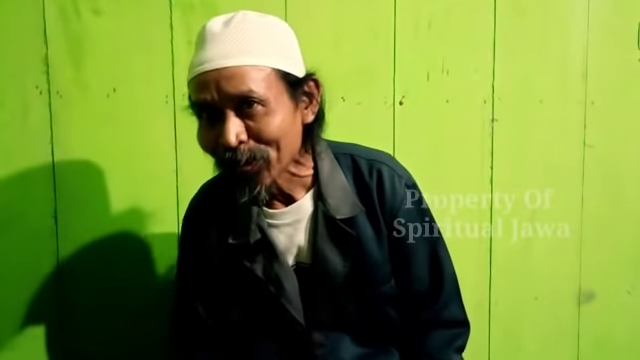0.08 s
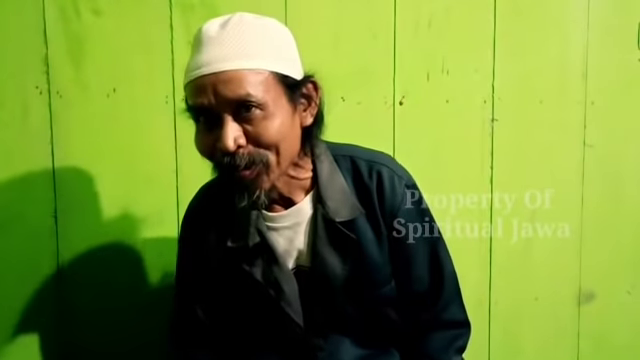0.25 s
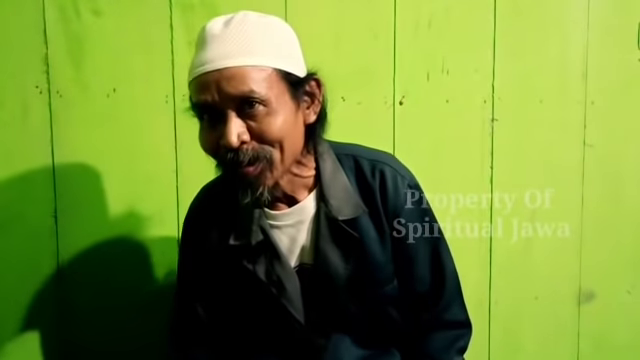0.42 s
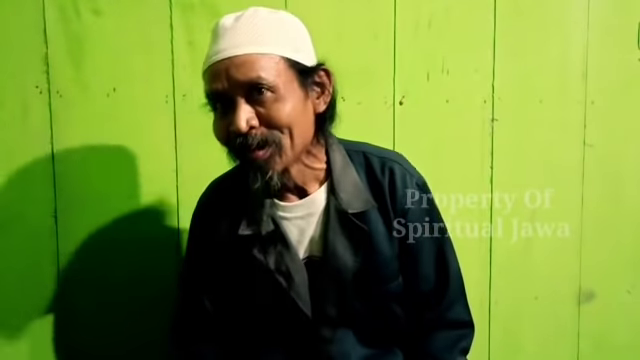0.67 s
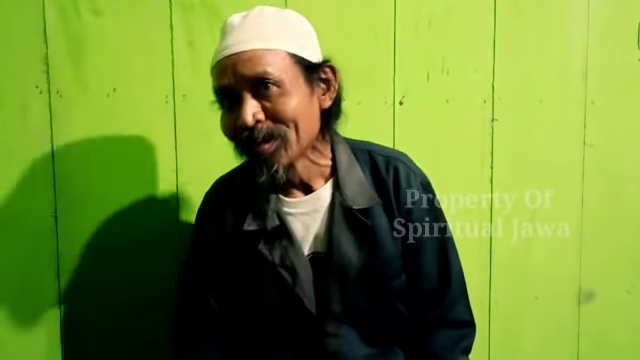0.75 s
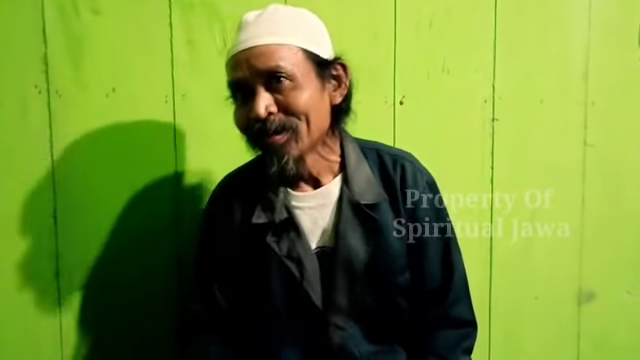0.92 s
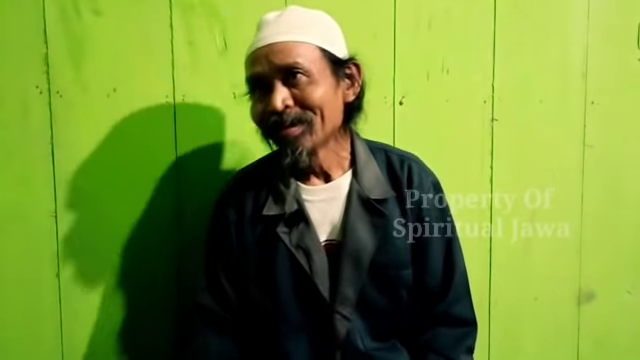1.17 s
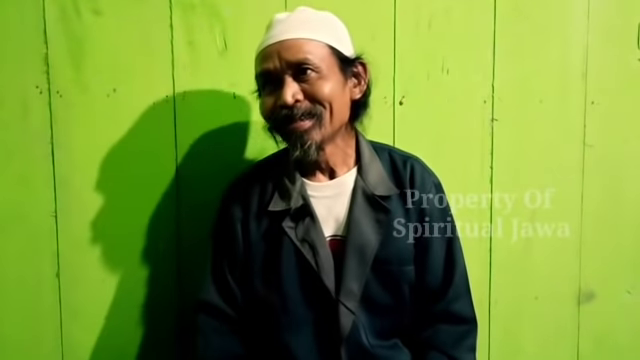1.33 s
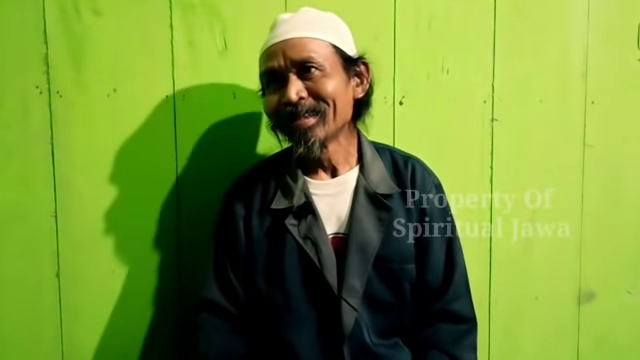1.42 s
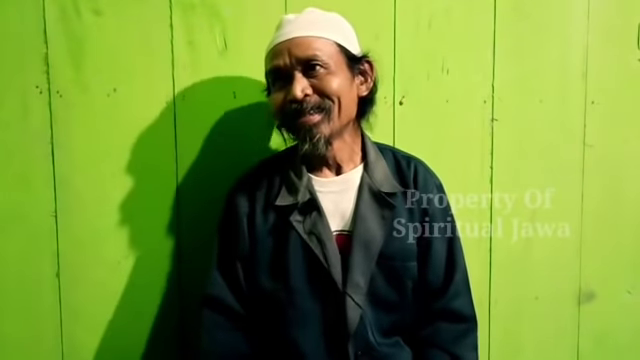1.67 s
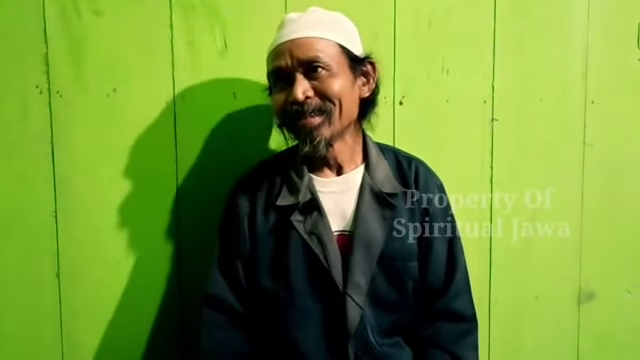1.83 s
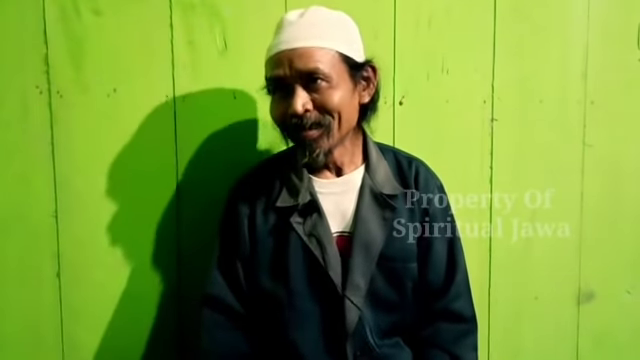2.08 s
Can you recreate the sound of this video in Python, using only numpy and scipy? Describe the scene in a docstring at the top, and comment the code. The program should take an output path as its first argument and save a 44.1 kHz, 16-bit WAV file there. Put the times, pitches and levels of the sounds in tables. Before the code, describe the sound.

A dove coos four times in a hard-walled room, heard in stereo. A short hoot comes at 0.1 seconds, an arched note from 0.4 to 0.6, a long falling note opening with a rolling trill from 0.8 to 1.3, and a last arch from 1.6 to 1.85. Wall echoes smear the nearly pure tone. Faint ticks, rustles, low hum and thin hiss lie underneath.

```python
"""A dove coos four times in a hard-walled room, heard on a pair of microphones: a short hoot,
an arched note, a long note that opens with a rolling trill, and a last arch. Its nearly pure
tone overlaps its own wall echoes, so it beats and smears wherever the pitch glides.
Under it lie a few faint ticks and rustles, a low room hum and thin hiss."""
import sys
import numpy as np
from scipy import signal
from scipy.fft import rfft, irfft
from scipy.io import wavfile
from scipy.ndimage import uniform_filter1d

SR = 44100
rng = np.random.default_rng(int(sys.argv[2]) if len(sys.argv) > 2 else 0)


def to_wav(sig):
    """Store sig (one row per channel, or 1-D mono) as 16-bit WAV at the path in sys.argv[1].

    Samples outside -1..1 are clipped; the rate is SR.
    """
    pcm = np.clip(np.atleast_2d(sig), -1, 1) * 32767
    pcm = np.round(pcm).astype(np.int16)
    wavfile.write(sys.argv[1], SR, pcm.T)  # frames by channels


N = 92521

# The four coos, and a faint low tone under the hoot.
# Each row: time in seconds, pitch in Hz, level in dB.
HOOT = [(0.079, 610.5, -54.5), (0.0928, 600, -31), (0.1062, 632.2, -23.5), (0.1176, 598, -29.5),
        (0.1345, 615, -49)]
ARCH = [(0.361, 543.4, -50.5), (.374, 628, -38.5), (0.3871, 710, -28), (.408, 789.8, -25),
        (0.4299, 808.3, -34), (0.476, 779, -23), (0.5086, 779.8, -23.5), (0.555, 762, -23.5),
        (0.5697, 778.8, -28.5), (0.5915, 733, -20.5), (0.6044, 635.4, -27.5), (0.6145, 566, -29.5),
        (0.623, 502, -40), (.634, 457, -46)]
LONG_COO = [(0.8046, 601, -52), (0.8194, 595.7, -29.5), (0.8321, 637.6, -29.6), (0.856, 807.5, -26.5),
            (0.893, 810.8, -31.5), (0.961, 849.3, -26.5), (1.0095, 818.6, -32.5), (1.0398, 784, -24),
            (1.1033, 774, -26.5), (1.1378, 726, -22), (1.1662, 685, -21), (1.176, 683, -23),
            (1.1895, 617.5, -21.5), (1.2108, 600, -24.0), (1.2414, 584.4, -31), (1.2868, 597.3, -27),
            (1.3027, 614, -54)]
LAST_ARCH = [(1.584, 419.4, -47), (1.591, 475, -42), (1.5991, 601, -39.5), (1.6134, 674.4, -22),
             (1.6325, 661.8, -23), (1.653, 738.7, -24.5), (1.693, 731.3, -20), (1.728, 709.3, -24.5),
             (1.7485, 682, -20), (1.759, 684.3, -23), (1.7721, 620.3, -21.5), (1.795, 589.7, -24.5),
             (1.813, 550.5, -43), (1.8284, 540, -30), (1.8495, 511, -45.5)]
UNDERTONE = [(.110, 317, -53), (0.135, 301, -49.5), (0.159, 287, -45.5), (.178, 277, -79)]
# Where the voice rolls. Each row: start and end in seconds, flutter rate in Hz,
# pitch drop and amplitude drop as fractions.
ROLLS = [(.357, 0.403, 62.8, .05, 1), (0.611, 0.639, 85.5, .12, 0.86), (0.827, 0.923, 64.94, .18, 0.77),
         (0.9194, 1.0373, 52.8, .39, 0.96), (1.5913, 1.654, 84.45, .18, 0.61)]
# Direct sound, then wall echoes, at each microphone. Each row: travel time in ms, gain in dB.
LEFT_MIC_PATHS = [(7.72, -10), (10.64, -4.5), (10.92, -10), (14.36, -15.5), (16.88, -4), (20.88, -4.5),
                  (26.64, -8.5), (29.16, -8.5), (36.08, -11.5), (41.24, -6), (45.16, -17), (48.96, -9),
                  (55.84, -23.5), (57.32, -9), (66.44, -16), (67.84, -20), (72.6, -22.5), (79.88, -17.5),
                  (83.56, -28.5), (86.2, -22), (91.48, -12.5), (96.32, -21.5), (102.72, -16),
                  (111.32, -28.5), (116.4, -20), (119.92, -14), (126.24, -22.5), (129.72, -24),
                  (138.28, -24.5), (148.0, -19), (153.64, -18), (159.28, -18), (171.96, -20.5),
                  (190.64, -24.5), (201.84, -26), (215.32, -28)]
RIGHT_MIC_PATHS = [(7.16, -12), (8.8, -0.6), (10.72, -10.5), (15.44, -8), (19.28, -14), (24.08, -16.5),
                   (28.68, -19.5), (32.72, -14), (36.48, -25.5), (39.32, -5), (42.84, -20), (46.04, -14),
                   (50.2, -12.5), (55.12, -21), (60.4, -14.5), (66.04, -10.5), (72.28, -17.5),
                   (80.12, -9.5), (95.68, -22.5), (99.2, -16), (103.8, -16), (109.12, -20), (117.92, -16.5),
                   (123.28, -23.5), (129.52, -18.5), (134.36, -23), (141.48, -18.5), (155.0, -22.5),
                   (172.24, -22.5), (181.88, -24.5), (187.36, -23.5), (198.04, -28), (201.64, -23.5),
                   (207.28, -24.5), (215.2, -22.5), (221.84, -35.5)]
# Faint ticks. Each row: start in seconds, level of the body in dB, level of the top in dB.
TICKS = [(.119, -46, -55.5), (0.409, -47.5, -60), (0.741, -44.5, -45.5), (1.41, -56.5, -59.5)]
# Soft rustles. Each row: peak time, rise and fall in seconds, level in dB, centre in Hz,
# width in octaves.
RUSTLES = [(0.228, 0.045, 0.034, -52, 1730, 0.55), (0.208, 0.07, 0.037, -58, 4050, 0.19),
           (0.21, 0.071, 0.059, -60, 6860, 0.17), (.88, 0.078, 0.074, -58.5, 6930, 0.19),
           (.96, 0.25, 0.15, -62.5, 1710, 0.97), (1.634, 0.0069, 0.028, -59.5, 13350, 0.11),
           (1.634, 0.012, 0.033, -57.5, 3287, 0.9)]
# Noise spectra of the ticks and the room tone. Each row: frequency in Hz, relative level in dB.
TICK_BODY = [(1500, -20), (3800, 2), (5400, -1.5), (6800, 3.5), (8300, 1), (8900, -27)]
TICK_TOP = [(11000, -35), (11800, 1.5), (16000, 5), (17000, -41.5)]
HUM = [(15, -54), (25, -30), (32, -25), (76, -2), (129, 2.5), (252, -3), (298, -4.5), (385, -7.5),
       (450, -9.5), (580, -47.5), (990, -120)]
AIR = [(300, -14), (450, 2), (800, 9), (1100, -5), (1600, -26.5)]
HISS = [(650, -35), (1100, -1), (3150, -7.5), (3640, 2.5), (4060, -6), (4590, -1), (5420, -11.5),
        (6760, -5), (8340, -10.5), (8620, -15), (8910, -39.5), (10100, -25.5), (11100, -36.5),
        (11500, -16.5), (12000, -12), (14800, -8.5), (15500, -11)]

PITCH_JITTER, SHIMMER_DB = 0.001, 0.2
ROLL_EDGE_S, ROLL_PITCH_WANDER = 0.011, 0.02
THROAT_TOP_HZ = 980  # the throat passes little above this
OVERTONE_DB, OVERTONE_HZ, OVERTONE_WIDTH_HZ = -31, 1608, 20
ROOM_T60_S, ROOM_DB, ROOM_BUILD_S = 0.62, -15, 0.17  # diffuse tail
HUM_DB, AIR_DB, HISS_DB = -55, -62, -59.5
DRONE_HZ, DRONE_DB = 209.9, -65
TICK_PAN_DB, HUM_PAN_DB, HISS_PAN_DB = 4, 2.5, 1.5
RECORDER_TOP_HZ = 15800


def coo(t, curve):
    """The dove's nearly pure gliding tone; its second harmonic passes a narrow resonance."""
    times, hz, db = np.array(curve).T
    gate = np.clip(np.minimum(t - times[0], times[-1] - t) / 0.012 + 1, 0, 1)
    level = undb(np.interp(t, times, db) + SHIMMER_DB * wander(100))
    sag, choke = rolls(t)
    envelope = gate * level * (1 - choke)
    pitch = np.interp(t, times, hz) * (1 - sag + PITCH_JITTER * wander(150))
    phase = 2 * np.pi * np.cumsum(pitch) / SR
    throat = 1 / (1 + (np.fft.rfftfreq(N, 1 / SR) / THROAT_TOP_HZ) ** 24)
    fundamental = irfft(rfft(envelope * np.sin(phase)) * throat, N)
    resonance = undb(OVERTONE_DB) / (1 + ((2 * pitch - OVERTONE_HZ) / OVERTONE_WIDTH_HZ) ** 2)
    return fundamental + envelope * resonance * np.sin(2 * phase)


def rolls(t):
    """Where the voice rolls, pitch sags and strength is choked together in quick pulses."""
    sag, choke = 0, 0
    uneven = ROLL_PITCH_WANDER * wander(250)
    for start, end, rate_hz, pitch_drop, amplitude_drop in ROLLS:
        edge = np.clip(np.minimum(t - start, end - t) / ROLL_EDGE_S, 0, 1)
        dip = edge * np.sin(np.pi * rate_hz * (t - start)) ** 4
        sag += pitch_drop * dip + edge * uneven
        choke += amplitude_drop * dip
    return sag, choke


def room(t, voice):
    """Each microphone gets the direct sound, echoes off the hard walls, then a diffuse tail."""
    padded = 2 * N
    hz = np.fft.rfftfreq(padded, 1 / SR)
    early = np.array([sum(undb(db) * np.exp(-2j * np.pi * hz * ms / 1000) for ms, db in paths)
                      for paths in (LEFT_MIC_PATHS, RIGHT_MIC_PATHS)])
    decay = np.exp(-np.log(1000) * t / ROOM_T60_S)
    build = 1 - np.exp(-(t / ROOM_BUILD_S) ** 2)
    tail = undb(ROOM_DB) * unit(rng.standard_normal((2, N)) * decay * build) / np.sqrt(N)
    return irfft(rfft(voice, padded) * (early + rfft(tail, padded)), padded)[:, :N]


def ticks(t):
    """Tiny bright clicks left of centre that die at once, each with its own share of top."""
    body, top = noise(TICK_BODY), noise(TICK_TOP)
    out, decay_s = 0, 0.0029
    for start, body_db, top_db in TICKS:
        envelope = (t >= start) * np.exp(-np.abs(t - start) / decay_s)
        out += envelope * (undb(body_db) * body + undb(top_db) * top)
    return out * pan(TICK_PAN_DB)


def rustles(t):
    """Brief swells of soft noise, each in its own band."""
    out, steps = 0, np.arange(-4, 5)
    for peak, rise, fall, db, hz, width in RUSTLES:
        band = noise(np.column_stack([hz * 2 ** (steps * width), -4 * steps ** 2]))
        swell = np.exp(-np.abs(t - peak) / np.where(t < peak, rise, fall))
        out += undb(db) * swell * band
    return out * pan(HISS_PAN_DB)


def room_tone(t):
    """The room behind the bird: low hum, midrange air, one weak drone and steady hiss."""
    hum = undb(HUM_DB) * noise(HUM, shared=0.29)
    air = undb(AIR_DB) * noise(AIR, shared=0.29)
    drone = undb(DRONE_DB + 2 * wander(2.4)) * np.sin(2 * np.pi * DRONE_HZ * t + 0.5 * wander(5.6))
    hiss = undb(HISS_DB) * noise(HISS)
    return (hum + air + drone) * pan(HUM_PAN_DB) + hiss * pan(HISS_PAN_DB)


def noise(spectrum, shared=0.):
    """Coloured stereo noise at rms 1; `shared` is the part of its power common to both microphones."""
    hz, db = np.array(spectrum, float).T
    gain = undb(np.interp(np.log(np.fft.rfftfreq(N, 1 / SR) + 1), np.log(hz), db))
    white = rng.standard_normal((3, N))
    pair = np.sqrt(1 - shared) * white[:2] + np.sqrt(shared) * white[2]
    return unit(irfft(rfft(pair) * gain, N))


def wander(rate_hz):
    """Smooth random drift around zero."""
    hold = int(SR / rate_hz)
    steps = np.repeat(rng.standard_normal(1000), hold)[:N]
    return 0.92 * uniform_filter1d(uniform_filter1d(steps, hold), hold)


def pan(db):
    """Gains that put the left microphone `db` above the right."""
    return undb(np.array([[db], [-db]]) / 2)


def undb(db):
    """Decibels to gain."""
    return 10 ** (np.asarray(db) / 20)


def unit(x):
    """Scale to rms 1."""
    return x / np.sqrt(np.mean(x ** 2))


def scene():
    """The dove in its room, over the small noises and the room tone."""
    t = np.arange(N) / SR
    dove = sum(coo(t, curve) for curve in (HOOT, ARCH, LONG_COO, LAST_ARCH))
    return room(t, dove) + coo(t, UNDERTONE) + ticks(t) + rustles(t) + room_tone(t)


def record(dry):
    """The recorder cuts the top."""
    return signal.sosfilt(signal.ellip(10, .1, 80, RECORDER_TOP_HZ, fs=SR, output="sos"), dry)


dry = scene()
out = record(dry)
to_wav(out)
```